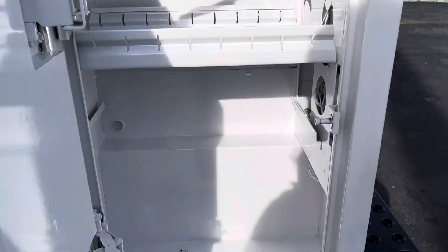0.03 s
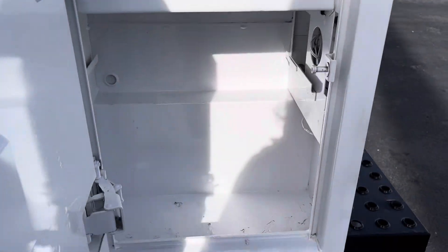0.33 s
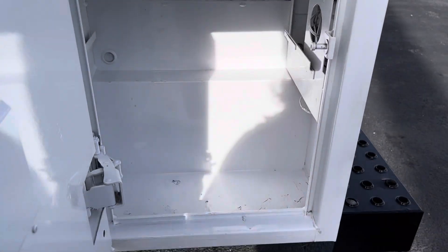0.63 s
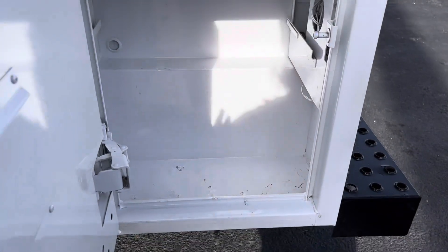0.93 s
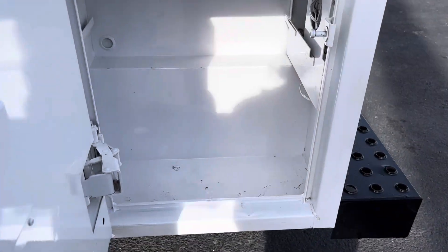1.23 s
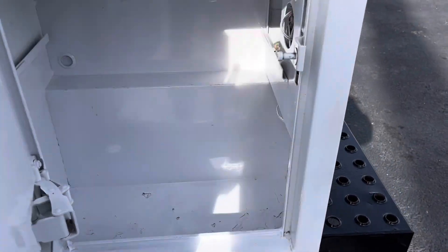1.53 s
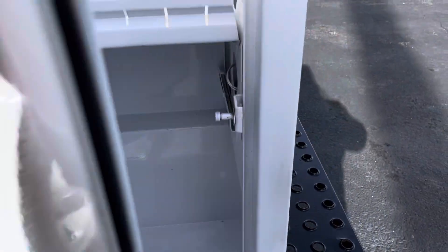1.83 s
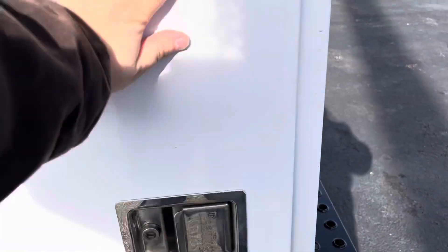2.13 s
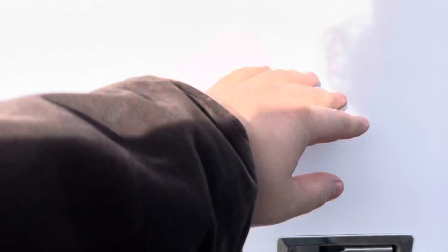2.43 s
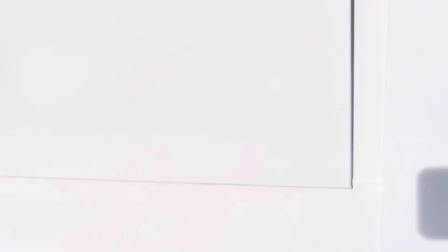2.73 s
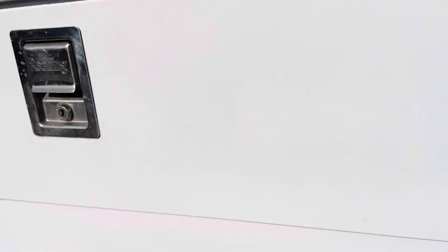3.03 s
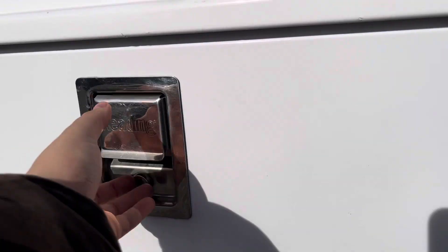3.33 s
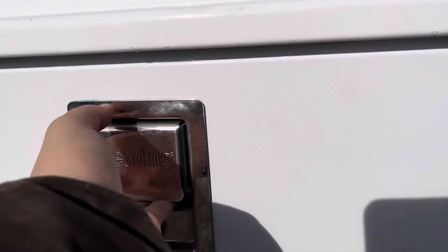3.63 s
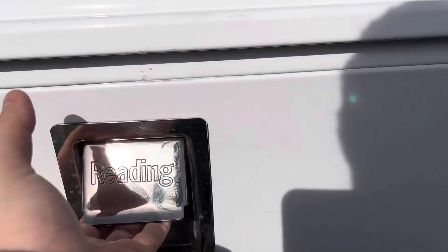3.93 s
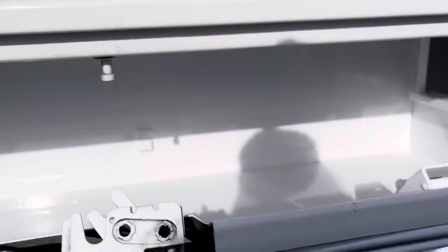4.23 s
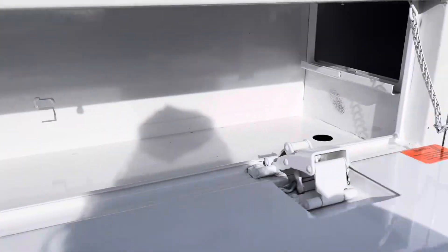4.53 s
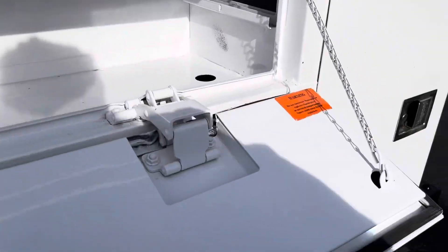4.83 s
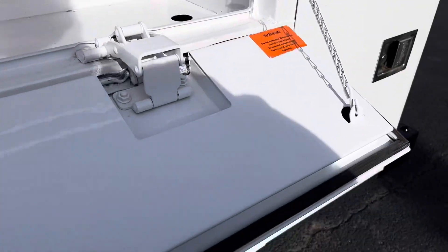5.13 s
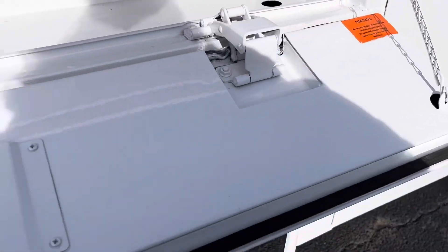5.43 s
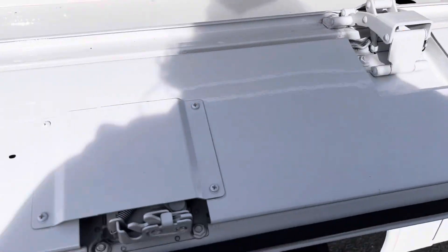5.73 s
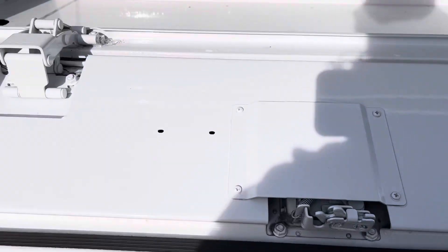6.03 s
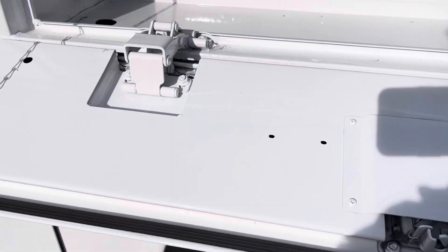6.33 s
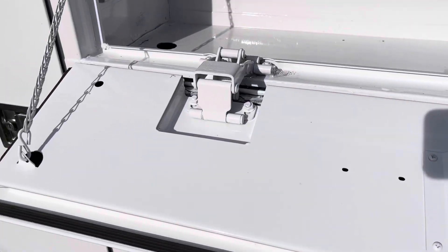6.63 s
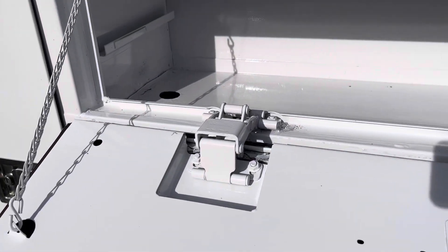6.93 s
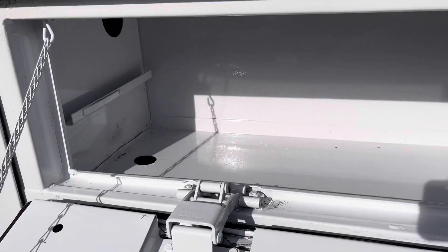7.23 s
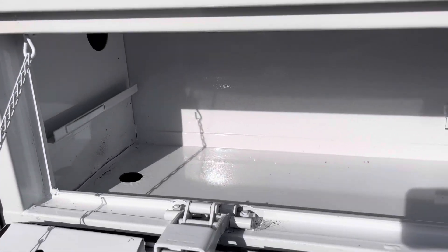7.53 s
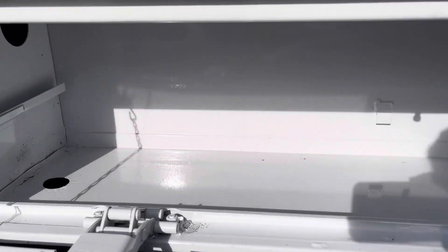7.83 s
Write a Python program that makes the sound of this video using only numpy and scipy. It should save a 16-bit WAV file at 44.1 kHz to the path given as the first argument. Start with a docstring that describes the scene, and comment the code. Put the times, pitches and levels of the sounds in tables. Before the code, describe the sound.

Wind buffets the microphone as a steel truck compartment door slams, then a latch snaps and a fold-down door clunks into its chains.

```python
"""Wind buffets the microphone; then a service truck's steel compartment door swings and slams shut.
A paddle latch is pulled, and a fold-down door springs free and drops into its chains, booming and
rattling. Each impact excites damped modes of the struck part and the dense ring of the steel body;
flexing panels radiate the thumps. Traffic hisses and an engine drones some way off."""
import sys
import numpy as np
from scipy import signal
from scipy.fft import rfft, irfft, next_fast_len
from scipy.io import wavfile
from scipy.ndimage import uniform_filter1d, map_coordinates

SR = 44100
rng = np.random.default_rng(int(sys.argv[2]) if len(sys.argv) > 2 else 0)


def wav_record(signal):
    """Record a signal, one row per channel, as 16-bit PCM in the file named by sys.argv[1]."""
    frames = np.transpose(np.atleast_2d(signal))
    bounded = np.clip(frames, -1, 1)
    # unit amplitude maps onto the largest positive 16-bit level
    quanta = np.round(bounded * 32767).astype(np.int16)
    wavfile.write(sys.argv[1], SR, quanta)


N = 347508
RING = 24576  # samples in one impact

# Levels are relative. Knock and bite weight a bass and a treble shelf; t60 is the time to fall 60 dB.
# the side door hits its frame and rattles shut: t/s, level/dB, knock/dB
SLAM_HITS = [(2.1288, -5, -14.5), (2.1318, -10, 0.5), (2.1424, -18.5, 6), (2.1497, -17.5, 7),
             (2.1597, -18, 7.5), (2.1620, -17, 2), (2.1661, -19, 15.5)]
# a bolt meets or leaves its striker: t/s, level/dB, chatter t60/s
BOLT_HITS = [(2.1166, -8, 0.019), (2.1328, -16.5, 0.0091), (3.8925, -31.5, 0.061), (4.049, -22, .007)]
# contacts: t/s, level/dB, knock/dB, bite/dB, chatter t60/s
LATCH_HITS = [(3.6945, -30, -4, -4, .06), (3.7170, -20, -8, -4, .04), (3.7250, -8, 0, -3, .022),
              (3.7335, -21, 2, -12, .04), (4.0310, -32, -3, 5, .05), (4.0498, -14, -6, 15.5, .006)]  # the paddle is pulled and the lock lets go
DROP_JOLTS = [(4.0620, -24, 5, -3.5, 0.16), (4.1250, -41.5, -4, 10, 0.068), (4.7680, -32.5, 11.5, -5, 0.22),
              (4.8030, -31, 6, -17.5, 0.16)]  # the fold-down door springs free, later rebounds
CHAIN_HITS = [(4.5585, -30.5, -4.5, 4.5, 0.057), (4.5660, -30.5, 5, -7.5, .09),
              (4.6235, -28, -11, -9, 0.036), (4.6280, -22, -11.5, -13, .025), (4.6520, -37, -3, 3, 0.027),
              (4.7180, -42, -3, -6.5, 0.2), (6.1000, -51.5, -4, 2.5, 0.15)]
BODY_TAPS = [(1.391, -34.5, 10.5, -35.5, 0.11), (2.6755, -26.5, -9.5, -5.5, 0.0071),
             (7.6520, -38, 2.5, 3.5, 0.12)]
LINKAGE_HITS = [(4.2255, -37.5, 4, 4, .1), (4.2380, -37, 4, -6, .12), (4.6630, -24, -10, -4, .02)]
# contacts: t/s, level/dB
DROP_LANDING = [(4.6273, -20.5), (4.641, -24.5), (4.6520, -22.5), (4.6620, -19.5), (4.6800, -25.5),
                (4.6970, -25)]  # the door lands in its chains
LOCK_TICKS = [(2.2770, -66.5), (3.8830, -57.5), (4.1850, -57), (4.3685, -48), (4.4630, -55)]  # loose lock parts
# panels flexing under a blow: t/s, level/dB, f/Hz, t60/s
PANEL_FLEXES = [(1.346, -30.5, 270.3, 0.78), (2.1330, -1.5, 121.4, 0.12), (2.1304, -5.5, 298, 0.043),
                (2.141, -8.5, 179, 0.091), (2.15, -6, 75, 0.12), (3.728, -11.5, 153, 0.049),
                (3.729, -13.5, 234, 0.11), (4.0600, -26, 759, 0.19), (4.0660, -26, 306, 0.61),
                (4.653, -11, 312.6, 0.11), (4.6730, -3, 290.4, 0.094), (4.6770, -11.5, 429, 0.098),
                (4.681, -10, 158, 0.1), (4.68, -16, 212, 0.44), (4.844, -16, 62, 0.46)]

# impact noise of each part: f/Hz, level/dB
SIDE_SPECTRUM = [(80, 0.5), (320, 3.5), (700, -0.5), (1000, -0.5), (1500, 1.5), (2300, -10.5),
                 (3000, -12.5), (4000, -13), (7000, -17), (12000, -13.5), (15000, -37.5)]
BOLT_SPECTRUM = [(200, -6), (900, -9), (1500, 0.5), (2200, -9), (4000, -0.5), (7000, -16.5), (12000, -12),
                 (15000, -27)]
LOCK_SPECTRUM = [(80, -52), (400, 5), (650, -6.5), (1020, 4), (1500, 0), (2100, -6), (2750, -6),
                 (3700, -9.5), (7000, -15.5), (12500, -10.5), (15500, -29.5)]
DROP_SPECTRUM = [(80, -15.5), (190, -10.5), (320, 2.5), (560, -6.5), (820, 0.5), (1400, -11), (2800, -17),
                 (5500, -21), (12000, -20), (15000, -40)]
CHAIN_SPECTRUM = [(200, -6), (1000, -6), (2100, -5), (3400, -3.5), (4400, -2.5), (6500, -15), (11000, 0),
                  (15000, -21)]
TAP_SPECTRUM = [(200, 5.5), (1000, 2.5), (2000, -3), (4200, -4), (7000, -16.5), (13000, -31)]
# normal modes of each part: f/Hz, level/dB, t60/s
SIDE_MODES = [(312, -14, 0.19), (437.5, -23, 0.25), (520, -25, 0.4), (625, -27, 0.4), (960, -7, 0.027),
              (1230, -9, 0.031), (1440, -7, .035), (1680, -11, .035), (2940, -17, 0.035), (4250, -21, 0.03),
              (5200, -23, .035)]
BOLT_MODES = [(1444, -2.5, .055), (2926, -7, .018), (3690, -7, .02), (4270, -8, .03), (5100, -15, .04)]
LOCK_MODES = [(315, -6.5, 0.22), (1030, -6, 0.026), (1540, -15.5, 0.12), (1900, -14, 0.16),
              (2340, -17, 0.06), (2980, -16, 0.15), (3800, -9.5, 0.024), (4160, -28, 0.19)]
DROP_MODES = [(285, -18, .85), (300, -9, .176), (415, -14, .17), (672, -15, .35), (861, -10, .15),
              (1240, -18, .14), (1360, -19, .16), (1930, -22, .17), (2261, -22, .2), (2649, -21, .15),
              (3350, -27, .15)]
CHAIN_MODES = [(2885, -15, .09), (3128, -19, .13), (3731, -11, .065), (4216, -18, .06), (4802, -18, .07),
               (10790, -17, .065), (11360, -17, .06)]
TAP_MODES = [(1990, -1.5, 0.024), (2740, -10, 0.038), (3180, -16.5, .045)]
LINKAGE_MODES = [(1125, -10, .23), (1766, -12, .3), (2487, -14, .22), (2842, -11, .16), (4457, -19, .13)]
# decay of the steel body's dense ring: f/Hz, t60/s
BODY_DECAY = [(100, 0.21), (400, 0.83), (1000, 0.25), (3000, 0.24), (7000, 0.15), (13000, 0.1)]
# left-right coherence of the impact noise: f/Hz, coherence/1
METAL_COHERENCE = [(200, 0.71), (400, 0.72), (1000, 0.39), (2500, 0.6), (12000, 0.14)]
# the two microphone ports favour different bands: f/Hz, share of left_db/1
LEFT_BIAS = [(400, .5), (1000, -.8), (1500, -.6), (2300, .4), (4500, .4), (10000, -.2)]
# the left port hears the impacts first: f/Hz, phase lead/rad
LEFT_LEAD = [(100, 0.49), (400, 0.18), (2500, 0.18), (10000, 0.19)]

# envelopes of friction and steady wind: t/s, level/dB
HINGE_LEVEL = [(0, -100), (1.45, -78), (1.62, -62), (1.73, -51), (1.83, -60), (1.9, -56), (2.12, -90)]
SLEEVE_LEVEL = [(2.5, -78), (2.8, -60), (3.05, -58.5), (3.45, -65), (3.7, -89)]
BREEZE_LEVEL = [(0, -30), (1.1, -32), (2.0, -30.5), (2.9, -31), (3.7, -25.5), (4.52, -42.5), (5.05, -29.5),
                (5.9, -21.5), (6.12, -42.5), (6.9, -33), (7.5, -26), (7.88, -28)]
# gusts: t/s, length/s, rumble level/dB, flutter over rumble/dB
WIND_GUSTS = [(2.399, 0.15, -22.5, -11), (2.697, 0.4, -23, -15.5), (3.042, 0.09, -21, -19),
              (3.316, 0.17, -20.5, -9), (3.52, 0.45, -33.5, -3), (3.943, 0.21, -20.5, -15.5),
              (4.336, 0.19, -30, -11.5), (4.833, 0.31, -21.5, -13), (5.604, 0.094, -22, -2.5),
              (5.739, 0.089, -27, -0.5), (5.955, 0.062, -25.5, -6)]
# single eddies: t/s, peak level/dB, f/Hz
EDDIES = [(0.669, -12, 104), (2.605, -14, 240), (2.74, -12.5, 121), (3.282, -29, 432), (3.295, -8, 219),
          (3.887, -11.5, 98), (3.929, -17, 113), (3.956, -11, 112), (5.594, -12, 160), (5.614, -27.5, 390),
          (5.717, -12.5, 266), (5.771, -11.5, 163)]
# noise of friction, wind and tyres: f/Hz, level/dB
HINGE_SPECTRUM = [(3000, -8), (6500, -3), (10000, -3), (12500, 3.5), (15000, -14.5)]
CLOTH_SPECTRUM = [(2000, -21), (3600, 0.5), (4900, -0.5), (7000, -10.5), (13000, -13), (15000, -28.5)]
RUMBLE_SPECTRUM = [(20, -39.5), (35, -13.5), (60, 0.5), (95, -0.5), (130, 2), (200, -28.5), (320, -25),
                   (600, -75)]
FLUTTER_SPECTRUM = [(90, -49), (180, 4), (270, -4.5), (400, -12), (600, -29), (1200, -92)]
ROAR_SPECTRUM = [(200, 2.5), (450, 1), (700, -1), (1000, -3.5), (1550, -9), (1850, -16.5), (2800, -17.5),
                 (6000, -82)]
HISS_SPECTRUM = [(1200, 2.5), (2600, 5.5), (4200, 3.5), (6000, -2), (7500, -5), (12000, -5.5), (15000, -22)]
# far tyres: t/s, roar level/dB, hiss level/dB
TYRE_LEVELS = [(0.0, -49.5, -60.5), (0.9, -50, -60.5), (2.35, -49, -62), (3.73, -48.5, -59.5),
               (3.93, -47.5, -56.5), (5.1, -50.5, -60.5), (6.58, -48.5, -57), (7.88, -46, -58)]
# distant engine: t/s, firing f/Hz, level/dB
ENGINE_RUN = [(0, 89.5, -29), (.7, 88, -36), (1.5, 87.8, -32), (2.1, 86.4, -36.5), (3, 89.3, -50),
              (6.7, 109, -43.5), (7.3, 115.7, -31.5), (7.45, 117.6, -25), (7.63, 118, -21.5),
              (7.88, 123.9, -23.5)]
# its spectral lines: multiple of the firing rate/1, level/dB
ENGINE_ORDERS = [(1, 0), (1.55, -23), (1.75, -16), (2.06, -22), (2.27, -20), (3.1, -29)]
# the open side door reflects less as it swings away: t/s, gain/1
DOOR_REFLECTION = [(1.1, 0.18), (1.6, 0.07)]
# response to the sum and the difference of the ports, out of step near 8.5 kHz: f/Hz, level/dB
PORT_SUM = [(20, 1), (5200, 0), (7000, -1.5), (7700, -10), (8400, -36.5), (9200, -5.5), (13700, 4),
            (15500, -10)]
PORT_DIFFERENCE = [(7500, 0.5), (8700, 6), (10000, -1.5), (13700, -19.5), (15500, 23.5)]


def side_door(bite_db=7.5, chatter_s=.018):
    """Impact and rebound: the door strikes its frame several times in quick succession."""
    hits = [(*hit, bite_db, chatter_s) for hit in SLAM_HITS]
    return struck(hits, SIDE_SPECTRUM, SIDE_MODES, body_db=-20, ring_db=-1.5, left_db=3, peaks_db=-2.5)


def drop_door(knock_db_per_s=200, bite_db_per_s=-95.5, chatter_s=0.1):
    """Impact under growing load: contacts get heavier and duller as the chains take the weight."""
    hits = list(DROP_JOLTS)
    for s, db in DROP_LANDING:
        elapsed = s - DROP_LANDING[0][0]
        hits.append((s, db, -3 + knock_db_per_s * elapsed, -4.5 + bite_db_per_s * elapsed, chatter_s))
    return struck(hits, DROP_SPECTRUM, DROP_MODES, body_db=-10, ring_db=2.5, left_db=1.5, peaks_db=4)


def panels(attack_s=0.0016):
    """Damped bending vibration: a sheet pushes the air, giving a low thump or a hollow knock."""
    track, t = np.zeros((2, N)), np.arange(RING) / SR
    for s, db, hz, t60 in PANEL_FLEXES:
        add(track, s, amp(db - 60 * t / t60) * (1 - np.exp(-t / attack_s)) * np.sin(2 * np.pi * hz * t))
    return track


def bolts():
    """Hard contact between bolt and striker excites high, quickly damped modes."""
    hits = [(s, db, 0, 0, chatter_s) for s, db, chatter_s in BOLT_HITS]
    return struck(hits, BOLT_SPECTRUM, BOLT_MODES, body_db=-24, ring_db=-2, left_db=2.5, peaks_db=5)


def latch(tick_bite_db=21.5, tick_chatter_s=0.04):
    """Sudden release sets the paddle lock in free vibration; its loose parts tick."""
    hits = LATCH_HITS + [(s, db, 0, tick_bite_db, tick_chatter_s) for s, db in LOCK_TICKS]
    return struck(hits, LOCK_SPECTRUM, LOCK_MODES, body_db=-22, ring_db=-7.5, left_db=4.5, peaks_db=4)


def chains():
    """Collisions of small steel links excite high natural frequencies: separate clinks."""
    return struck(CHAIN_HITS, CHAIN_SPECTRUM, CHAIN_MODES,
                  body_db=-5.5, ring_db=6.5, left_db=8, peaks_db=2)


def grinding_links(centre_s=4.66, spread_s=.038, centre_hz=2000, t60=.075):
    """Links pulled taut grind in a dense run of clinks, each a damped oscillator with its own pitch."""
    track, t = np.zeros((2, N)), np.arange(SR // 10) / SR
    for when, octaves, size, phase in rng.uniform(-1, 1, (26, 4)):
        hz = centre_hz * 2 ** (.7 * octaves)
        db = -29.5 + 3 * size - 12 * when ** 2 - 2 * octaves - 60 * t / t60
        add(track, centre_s + spread_s * when, amp(db) * np.sin(2 * np.pi * hz * t + [[phase], [-phase]]))
    return track


def linkage():
    """Free play lets the lock's linkage collide and ring inside the moving door."""
    return struck(LINKAGE_HITS, TAP_SPECTRUM, LINKAGE_MODES,
                  body_db=-13.5, ring_db=0.5, left_db=4, peaks_db=3)


def taps():
    """Weak impulses excite a brief ring in the steel body."""
    return struck(BODY_TAPS, TAP_SPECTRUM, TAP_MODES, body_db=-28, ring_db=2.5, left_db=5, peaks_db=-1)


def pivots(squeak_s=3.682, squeak_hz=2570, squeak_db=-42):
    """Friction: the swinging hinge hisses; the paddle's pivot gives one tiny, unsteady squeak."""
    t = np.arange(N) / SR - squeak_s
    squeak = np.exp(-(t / .005) ** 2 / 2) * np.sin(2 * np.pi * squeak_hz * t + .8 * wobble(300))
    rub = stereo_noise(HINGE_SPECTRUM, coherence=.4)
    return amp(squeak_db) * squeak + amp(curves(HINGE_LEVEL)[0] + 1.5 * wobble(35)) * rub


def sleeve():
    """Sliding friction: cloth rustles unevenly as an arm reaches for the paddle."""
    cloth = stereo_noise(CLOTH_SPECTRUM, coherence=.5)
    return amp(curves(SLEEVE_LEVEL)[0] + 2.1 * wobble(12)) * cloth


def wind(flutter_db=-44, flutter_slope=.3):
    """Turbulent pressure at the microphone: breeze and gusts add in power; single eddies thud."""
    breeze_db, = curves(BREEZE_LEVEL)
    rumble = amp(breeze_db)
    flutter = amp(flutter_db + flutter_slope * (breeze_db - breeze_db.mean()))
    for s, length, db, over_db in WIND_GUSTS:
        swell = np.exp(-2 * ((np.arange(N) / SR - s) / length) ** 2)
        rumble = np.hypot(rumble, amp(db) * swell)
        flutter = np.hypot(flutter, amp(db + over_db) * swell)
    lumps = wobble(35)
    air = rumble * amp(-1.6 + lumps) * stereo_noise(RUMBLE_SPECTRUM, coherence=0.92)
    air += flutter * amp(1.5 + 3.9 * lumps) * stereo_noise(FLUTTER_SPECTRUM, coherence=0.9)
    t = np.arange(-SR // 20, SR // 20) / SR
    for s, db, hz in EDDIES:
        band = signal.butter(4, [hz / 2, hz * np.sqrt(2)], "band", fs=SR, output="sos")
        puff = signal.sosfilt(band, rng.standard_normal(len(t))) / np.cosh(t / 0.0042)
        add(air, s + t[0], amp(db) * puff / np.abs(puff).max())
    return air


def tyres():
    """Rolling contact radiates broadband noise: a far roar, and a hiss slightly to the left."""
    roar_db, hiss_db = curves(TYRE_LEVELS)
    roar = amp(roar_db + 6 + 0.39 * wobble(6)) * stereo_noise(ROAR_SPECTRUM, coherence=0.068)
    hiss = amp(hiss_db + 4) * stereo_noise(HISS_SPECTRUM, coherence=0.32) * amp([[1.2], [-1.2]])
    return roar + hiss


def engine():
    """Periodic firing gives a line spectrum, which rises as the distant engine pulls harder."""
    firing_hz, level_db = curves(ENGINE_RUN)
    phase = 2 * np.pi * np.cumsum(firing_hz * (1 + .008 * wobble(14))) / SR
    drone = sum(amp(db + wobble(12)) * np.sin(order * phase + .15 * order ** 2 * wobble(15))
                for order, db in ENGINE_ORDERS)
    return amp(level_db) * unit(drone)


def truck_reflections(x, wall_gain=0.33, wall_delay_s=0.0048, door_delay_s=0.000457):
    """Comb filtering: echoes off flat steel add a hollow colour that drifts as the microphone moves."""
    t = np.arange(N) / SR
    echo = lambda delay: np.array([np.interp(t - delay, t, channel) for channel in x])
    walls = wall_gain * echo(wall_delay_s * amp(1.28 * wobble(0.692)))
    return x + walls + curves(DOOR_REFLECTION)[0] * echo(door_delay_s)


def struck(contacts, spectrum, modes, body_db, ring_db, left_db, peaks_db):
    """Superposition: each contact sums brief chatter, the part's modes and the body's dense ring."""
    track, t, hz = np.zeros((2, N)), np.arange(RING) / SR, np.fft.rfftfreq(RING, 1 / SR)
    colour = minimum_phase(unit(amp(along(spectrum, hz))))
    knock_shelf = along([(400, 0.71), (900, 0.055)], hz)
    bite_shelf = along([(1600, 0.12), (6000, 0.64), (10000, 1)], hz)
    mode_hz, mode_db, mode_t60 = np.transpose(modes)
    mode_decay = amp(mode_db[:, None] + ring_db - 60 * t / mode_t60[:, None])
    ringing = mode_decay * np.exp(2j * np.pi * mode_hz[:, None] * t)
    # hundreds of lesser modes of the sheet give the same narrow peaks in every blow
    peaks = unit(uniform_filter1d(uniform_filter1d(rng.standard_normal(len(hz)), size=17), size=11))
    peaks = np.minimum(peaks, np.tanh(peaks))  # none towers over the rest
    body_peaks = minimum_phase(unit(amp(peaks_db * peaks)))
    crack_peaks = minimum_phase(unit(amp(0.27 * peaks_db * peaks)))
    band_hz, age, _ = signal.stft(np.zeros(RING), SR, nperseg=256)
    body_fade = amp(body_db - 60 * age / along(BODY_DECAY, band_hz)[:, None])
    for s, db, knock_db, bite_db, chatter_s in contacts:
        # within 10 ms the crack breaks up into uneven clinks
        clinks_db = 1.5 * unit(uniform_filter1d(rng.standard_normal(RING), 100)) * np.minimum(t / .01, 1)
        crack = rng.standard_normal((2, RING)) * amp(clinks_db - 60 * t / chatter_s)
        bands = signal.stft(rng.standard_normal((2, RING)), nperseg=256)[2]
        body = signal.istft(bands * body_fade, nperseg=256)[1]
        noise = rfft(crack) * crack_peaks + rfft(body) * body_peaks
        noise = spread(noise, along(METAL_COHERENCE, hz)) * colour
        # every blow lands elsewhere on the mode shapes; high modes reach the ports out of step
        phase = rng.uniform(0, 2 * np.pi, len(modes))
        phase = phase + rng.standard_normal((2, len(modes))) * np.minimum(mode_hz / 4000, 1)
        excitation = amp(rng.normal(0, 2, len(modes))) * np.exp(1j * phase)
        ring = (excitation @ ringing).imag * (1 - np.exp(-t / .0012))
        tone = minimum_phase(amp(knock_db * knock_shelf + bite_db * bite_shelf))
        add(track, s, amp(db) * irfft((noise + rfft(ring)) * tone))
    log_left_over_right = lambda f: np.log(amp(left_db * along(LEFT_BIAS, f))) + 1j * along(LEFT_LEAD, f)
    return filtered(track, lambda f: np.exp(np.outer([.5, -.5], log_left_over_right(f))))


def amp(db):
    """Decibels to amplitude ratio."""
    return np.exp(np.asarray(db) * np.log(10) / 20)


def unit(x):
    """Normalise to rms 1."""
    return x / np.sqrt(np.mean(x ** 2) + 1e-20)


def along(points, hz):
    """Interpolate (f/Hz, value) points on a log frequency axis."""
    f, v = np.transpose(points)
    return np.interp(np.log(hz + 1), np.log(f + 1), v)


def curves(rows):
    """Interpolate each column after t/s to one value per sample."""
    s, *cols = np.transpose(rows)
    return [np.interp(np.arange(N) / SR, s, c) for c in cols]


def wobble(rate):
    """Smooth random modulation, rate knots a second."""
    knots = rng.standard_normal(1024)
    coarse = np.arange(0, N + 64, 64)
    return np.interp(np.arange(N), coarse, map_coordinates(knots, [coarse * rate / SR], mode="wrap"))


def filtered(x, response):
    """Linear filtering: the spectrum of x times a frequency response."""
    m = next_fast_len(N + SR // 2, True)
    return irfft(rfft(x, m) * response(np.fft.rfftfreq(m, 1 / SR)), m)[..., :N]


def add(track, s, sound):
    """Superpose a sound on the track at time s."""
    part = track[:, round(s * SR):][:, :sound.shape[-1]]
    part += sound[..., :part.shape[1]]


def spread(pair, coherence):
    """Mix two independent signals into left and right of a given coherence."""
    turn = np.arccos(np.clip(coherence, -1, 1)) / 2
    mid, side = pair[0] * np.cos(turn), pair[1] * np.sin(turn)
    return np.array([mid + side, mid - side])


def stereo_noise(spectrum, coherence):
    """Partly coherent coloured noise of rms 1."""
    white = spread(rng.standard_normal((2, N)), coherence)
    return unit(filtered(white, lambda hz: amp(along(spectrum, hz))))


def minimum_phase(gain):
    """Causality: the response with this gain that never sounds before its cause."""
    cepstrum = irfft(np.log(gain + 1e-6))
    cepstrum[1:RING // 2] *= 2
    cepstrum[RING // 2 + 1:] = 0
    return np.exp(rfft(cepstrum))


def scene():
    """Sound pressures add at the two microphone ports."""
    metal = bolts() + side_door() + latch() + drop_door() + chains() + taps() + linkage()
    metal += grinding_links() + panels()
    return metal + pivots() + sleeve() + wind() + truck_reflections(tyres() + engine())


def record(dry, ceiling=.95, top_hz=15800):
    """Saturation rounds the slam; interference between the ports colours the band-limited treble."""
    left, right = dry / (1 + np.abs(dry / ceiling) ** 6) ** (1 / 6)
    ports = lambda hz: amp([along(PORT_SUM, hz), along(PORT_DIFFERENCE, hz)]) * (hz < top_hz)
    mid, side = filtered(np.array([left + right, left - right]) / 2, ports)
    return np.array([mid + side, mid - side])


dry = scene()
out = record(dry)
wav_record(out)
```